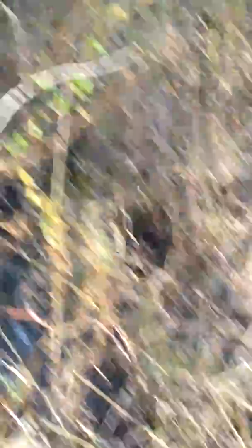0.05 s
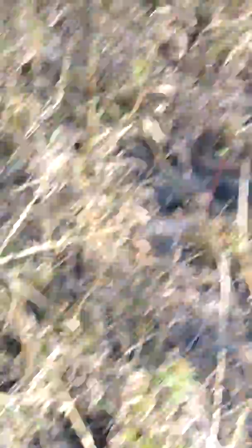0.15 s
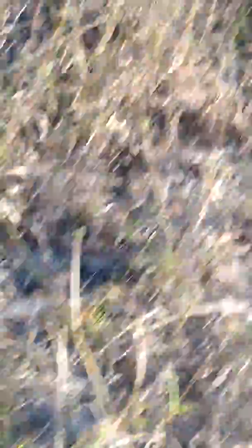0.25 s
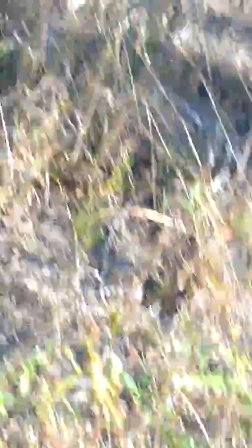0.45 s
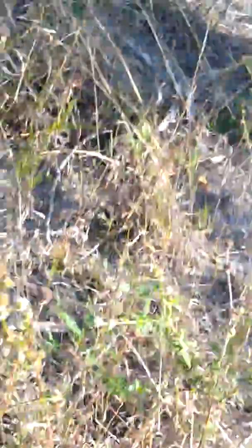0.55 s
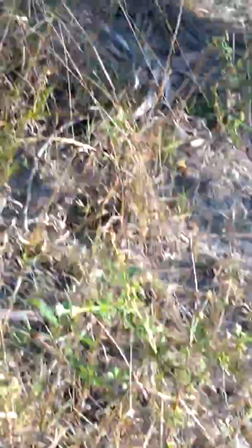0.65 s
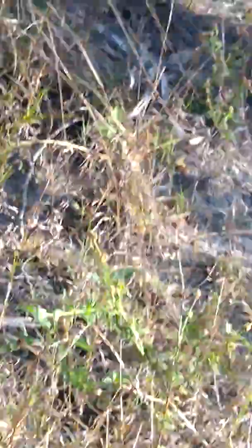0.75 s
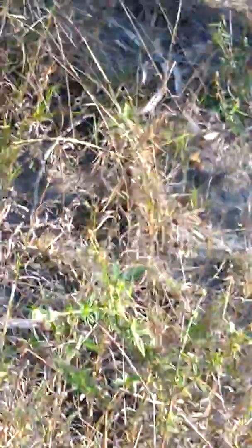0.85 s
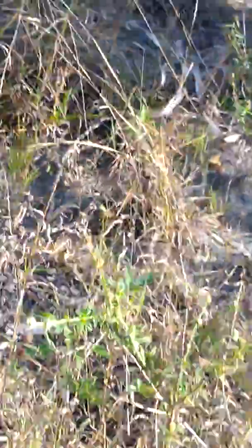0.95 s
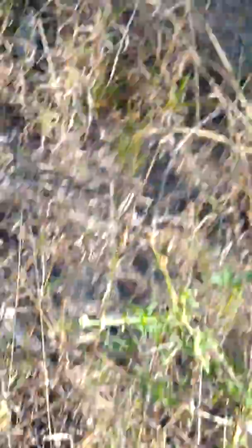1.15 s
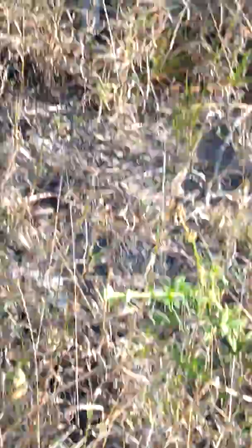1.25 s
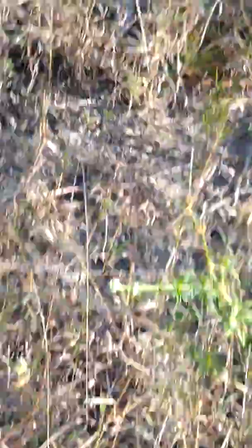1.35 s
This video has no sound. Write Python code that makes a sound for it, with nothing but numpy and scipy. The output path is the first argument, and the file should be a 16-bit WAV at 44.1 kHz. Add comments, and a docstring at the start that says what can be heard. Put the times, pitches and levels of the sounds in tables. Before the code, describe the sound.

Something knocks against the microphone and drags across it on the right, thudding and distorting briefly. Around it, dry grass rustles quietly close by outdoors, with a faint low hum, one thin distant whistle and then small stalk ticks.

```python
"""A bump on the right microphone of a hand-held camera, carried by someone stepping through dry grass.
Something hits it and rubs across: a crack, a few overloaded low thuds, a short scrape.
Dry blades swish and stalks tick around both microphones; light strokes brush the case.
A faint low hum runs underneath, and one thin, far whistle follows the bump."""
import sys
import numpy as np
from scipy import signal
from scipy.fft import rfft, irfft
from scipy.io import wavfile

SR = 44100
rng = np.random.default_rng(int(sys.argv[2]) if len(sys.argv) > 2 else 0)


def waveform_to_disk(signal):
    """Save audio, clipped to [-1, 1], as 16-bit WAV at the path in sys.argv[1]."""
    frames = np.transpose(np.atleast_2d(signal))
    scaled = np.clip(frames, -1, 1) * 32767
    samples = np.round(scaled).astype(np.int16)
    wavfile.write(sys.argv[1], SR, samples)


N = 61739
T = np.arange(N) / SR


def from_db(db):
    """Decibels to gain."""
    return 10 ** (np.asarray(db) / 20)


def unit_rms(x):
    """Scale to rms 1."""
    return x / np.sqrt(np.mean(x ** 2) + 1e-20)


def gain_curves(rows):
    """Each dB column of a timed table as a gain per sample."""
    times_s, *columns_db = np.transpose(rows)
    return np.array([from_db(np.interp(T, times_s, db)) for db in columns_db])


def stereo_gains(db, pan_db):
    """Left and right gains, pan_db apart, centred on db."""
    return from_db(db + np.array([[pan_db], [-pan_db]]) / 2)


def butter(x, hz, kind, order=2):
    """Causal low- or high-pass."""
    return signal.sosfilt(signal.butter(order, hz, kind, fs=SR, output="sos"), x + 1e-18)


def colour(x, spectrum):
    """Give a steady texture a spectrum; rms 1."""
    hz, db = np.transpose(spectrum)
    bins_hz = np.maximum(np.arange(N // 2 + 1) * SR / N, 1)
    shape = from_db(np.interp(np.log(bins_hz), np.log(hz), db))
    bass_rolloff = np.minimum(bins_hz / hz[0], 1) ** 2
    return unit_rms(irfft(rfft(x) * shape * bass_rolloff, N))


def decay(start_s, t60_s):
    """Sudden start, then an exponential fall."""
    return (T >= start_s) * from_db(-60 * np.maximum(T - start_s, 0) / t60_s)


def crackle(clicks_per_s=860, spread_db=2.5, click_share=0.38):
    """Dense tiny clicks of uneven size in smooth noise; rms 1."""
    sizes = from_db(spread_db * np.minimum(rng.exponential(1, N), 4)) * rng.choice([-1, 1], N)
    clicks = unit_rms(sizes * (rng.random(N) < clicks_per_s / SR))
    return np.sqrt(click_share) * clicks + np.sqrt(1 - click_share) * rng.standard_normal(N)


def flutter(depth_db=1.47, cutoff_hz=30):
    """Level wobble of blades that catch and slip."""
    return from_db(depth_db * unit_rms(butter(rng.standard_normal(N), cutoff_hz, "low")))


# Grass envelopes, before trim. Each row: time in seconds, left level in dB, right level in dB.
SWISH_LEVELS = [(0, -51.5, -48.5), (0.04, -56.6, -49.5), (0.07, -54.5, -51.5), (0.17, -60, -54),
                (0.205, -59, -47), (0.27, -66, -59), (0.33, -57.5, -51.5), (0.42, -71, -62),
                (0.48, -72, -58.5), (0.58, -95, -59.5), (0.72, -85, -63), (0.85, -81.5, -60),
                (0.95, -68.5, -56.5), (1.07, -64, -54.5), (1.14, -56.5, -50), (1.22, -62.0, -53),
                (1.3, -66, -65.5), (1.4, -57, -73)]
HISS_LEVELS = [(0, -47, -50.0), (0.04, -49, -46.5), (0.08, -52.5, -54), (0.16, -55.6, -58.5),
               (0.205, -49, -48), (0.27, -57.5, -56.5), (0.33, -45, -69), (0.41, -46.9, -49.5),
               (0.48, -50, -55), (0.57, -52, -57.5), (0.72, -62.5, -89), (0.88, -70.5, -75),
               (0.965, -68, -73), (0.99, -58, -75), (1.09, -53.5, -71), (1.14, -49, -52),
               (1.21, -58.5, -63.5), (1.29, -57.5, -86), (1.38, -46.5, -103)]
# Grass spectra. Each row: frequency in Hz, relative density in dB.
SWISH_LEFT_SPECTRUM = [(200, -13), (380, -8.5), (620, -5.5), (1000, -7.5), (2100, -1.5), (3200, -2),
                       (4500, -40), (16000, -51)]
SWISH_RIGHT_SPECTRUM = [(200, -2.5), (400, -12), (600, -2.5), (1100, -4), (2300, 1), (4000, -1.5),
                        (5200, 1.5), (7000, -4.5), (9000, -26), (16000, -42.5)]
HISS_LEFT_SPECTRUM = [(1500, -21.5), (3500, -11), (6000, -8.5), (9000, -3.5), (12500, 3.5), (15500, 0)]
HISS_RIGHT_SPECTRUM = [(3000, -42), (6000, 2), (7500, -1.5), (10000, -5), (13000, -6.5), (15500, -6.5)]

def grass(swish_trim_db=-2.5, hiss_trim_db=1.5):
    """Dry blades slide past each microphone: a grainy swish and a fine hiss."""
    def rustle(levels, *spectra):
        return gain_curves(levels) * np.array([colour(crackle(), side) * flutter() for side in spectra])

    swish = rustle(SWISH_LEVELS, SWISH_LEFT_SPECTRUM, SWISH_RIGHT_SPECTRUM)
    hiss = rustle(HISS_LEVELS, HISS_LEFT_SPECTRUM, HISS_RIGHT_SPECTRUM)
    return from_db(swish_trim_db) * swish + from_db(hiss_trim_db) * hiss


# Hum envelope. Each row: time in seconds, fundamental rms in dB, octave rms in dB.
HUM_LEVELS = [(0, -59.5, -70.5), (.2, -61.5, -67.5), (.45, -56, -88), (.62, -58, -71), (.86, -59.5, -69.5),
              (1.0, -56, -63), (1.25, -56.5, -60), (1.4, -56, -57.5)]

def hum(pitch_hz=80.5, third_re_octave_db=-19):
    """A low hum of three harmonics at a steady pitch."""
    fundamental_gain, octave_gain = gain_curves(HUM_LEVELS)
    phase = 2 * np.pi * pitch_hz * T
    overtones = np.sin(2 * phase) + from_db(third_re_octave_db) * np.sin(3 * phase)
    return np.sqrt(2) * (fundamental_gain * np.sin(phase) + octave_gain * overtones)


# Air spectrum. Each row: frequency in Hz, relative density in dB.
AIR_SPECTRUM = [(25, 6), (70, 4), (150, 12.5), (300, -15.5), (1000, -16), (4000, -49), (16000, -37)]

def air(level_db=-67.5):
    """Quiet outdoor air: low noise, independent on each side."""
    return from_db(level_db) * np.array([colour(rng.standard_normal(N), AIR_SPECTRUM) for _ in range(2)])


# Stalk ticks. Each row: start in seconds, peak before panning in dB, centre in Hz, t60 in seconds,
# left minus right in dB.
STALK_TICKS = [(.046, -37, 7150, 0.008, 2), (0.091, -41, 2030, .04, -4), (0.2, -41.5, 6060, 0.019, 8),
               (.527, -36, 12010, .008, 7), (0.87, -55.5, 2125, 0.016, -7),
               (0.9806, -46.5, 12800, 0.029, 17.5), (1.015, -47, 2190, 0.043, -7),
               (1.062, -49, 2230, 0.031, 0), (1.086, -48, 2200, 0.057, -11),
               (1.101, -47.5, 1570, 0.061, -2), (1.1191, -41.5, 5250, 0.022, -11),
               (1.1224, -41.5, 1750, 0.016, -15), (1.144, -42.5, 5400, 0.013, -11),
               (1.1451, -36.5, 12500, .018, 10), (1.156, -43.5, 2400, .025, -6),
               (1.178, -38, 5240, .01, -10), (1.207, -68, 2000, .005, 12), (1.236, -45, 5130, .015, 1),
               (1.2937, -48, 12700, 0.0031, 27), (1.3638, -44, 12100, 0.0032, 29)]

def stalks(resonance_q=1 / 0.37):
    """A stalk that flicks or snaps is a brief burst in one broad resonance."""
    out = np.zeros((2, N))
    for start_s, peak_db, centre_hz, t60_s, pan_db in STALK_TICKS:
        burst = decay(start_s, t60_s) * rng.standard_normal((2, N)) + 1e-18
        b, a = signal.iirpeak(centre_hz, resonance_q, fs=SR)
        tick = signal.lfilter(b, a, signal.lfilter(b, a, burst))
        out += stereo_gains(peak_db, pan_db) * tick / np.abs(tick).max()
    return out


# Strokes on the case. Each row: start in seconds, length in seconds, level in dB, low edge in Hz,
# high edge in Hz, left minus right in dB.
CASE_BRUSHES = [(0.163, 0.072, -69, 230, 500, -23), (0.375, 0.1, -55.5, 396, 4600, -18.5),
                (0.386, 0.087, -62, 107, 298, -34.5), (1.284, 0.064, -57.5, 125, 221, -21.5),
                (1.348, 0.054, -63, 108, 300, 7)]

def brushes():
    """Light strokes along the case: each is a grainy swell in its own band."""
    out = np.zeros((2, N))
    for start_s, length_s, db, low_hz, high_hz, pan_db in CASE_BRUSHES:
        stroke = np.sin(np.pi * np.clip((T - start_s) / length_s, 0, 1))
        friction = unit_rms(butter(butter(crackle(), high_hz, "low"), low_hz, "high", order=4))
        out += stereo_gains(db, pan_db) * stroke * friction
    return out


# Rubbing pressure. Each row: time in seconds, level in dB.
RUB_LEVELS = [(.218, -67), (.236, -31), (.246, -18), (.274, -13.5), (.29, -26.5), (.316, -28.5),
              (.328, -17.5), (.342, -26), (.372, -18), (.385, -34), (.397, -66)]
# Friction spectrum. Each row: frequency in Hz, relative density in dB.
FRICTION_SPECTRUM = [(30, -11), (46, 12.5), (90, -21.5), (200, 2.5), (400, -4), (700, -13.5), (1200, -22),
                     (2200, -33), (5000, -47), (16000, -84)]

def rubbing():
    """Something drags across the microphone: a dull friction rumble."""
    touching = (T > RUB_LEVELS[0][0]) & (T < RUB_LEVELS[-1][0])
    return gain_curves(RUB_LEVELS)[0] * touching * colour(crackle(), FRICTION_SPECTRUM)


# Sharp contacts. Each row: start in seconds, body peak before low-pass in dB, crack level in dB,
# crack t60 in seconds.
MIC_KNOCKS = [(0.242, -2, -19.5, 0.039), (0.2435, -8.5, -20, 0.0072), (0.2487, 0.5, -23, 0.015),
              (.3248, -6, -38.5, 0.0078), (.3815, -18.5, -30.5, .01), (.409, -50, -29, 0.0044),
              (0.7931, -42, -39.5, 0.0051), (1.3287, -36, -37.5, 0.0045)]
# Case modes. Each row: frequency in Hz, relative level in dB, t60 in seconds.
CASE_RESONANCES = [(358, 3.5, 0.054), (513, 17, 0.017), (839, 2, 0.016), (1750, -27, 0.0065)]

def knocks(step_relative_db=-15.5, low_hz=359, knee_hz=1670, top_hz=5650):
    """A contact is a pressure step, a short ring of the camera's case and a gritty crack."""
    out = np.zeros(N)
    for start_s, body_db, crack_db, crack_t60_s in MIC_KNOCKS:
        body = from_db(step_relative_db) * decay(start_s, t60_s=0.005)
        for hz, mode_db, t60_s in CASE_RESONANCES:
            body += from_db(mode_db) * decay(start_s, t60_s) * np.sin(2 * np.pi * hz * (T - start_s))
        body = butter(body / np.abs(body).max(), knee_hz, "low", order=1)
        grit = butter(rng.standard_normal(N), knee_hz, "low", order=1)
        grit = butter(grit, top_hz, "low", order=1)
        crack = decay(start_s, crack_t60_s) * unit_rms(butter(grit, low_hz, "high"))
        out += from_db(body_db) * body + from_db(crack_db) * crack
    return out


# Thuds of the bump. Each row: start in seconds, level in dB, starting pitch in Hz, swell in seconds,
# fade in seconds.
MIC_THUDS = [(0.2499, 0, 91.5, 0.0057, 0.033), (0.2937, -8.5, 76, 0.021, 0.0047),
             (0.3215, -9, 65.8, 0.0071, 0.0093), (.324, -9.5, 157.6, 0.019, 0.0079),
             (.350, -12, 127.3, 0.0092, 0.029)]

def thuds(rise_hz_per_s=950, octave_db=-11.5):
    """Each push swells and fades as a low boom whose pitch rises while the contact tightens."""
    out = np.zeros(N)
    for start_s, db, hz, swell_s, fade_s in MIC_THUDS:
        age_s = np.maximum(T - start_s, 0)
        envelope = np.sin(np.pi / 2 * np.interp(age_s, [0, swell_s, swell_s + fade_s], [0, 1, 0]))
        phase = 2 * np.pi * (hz * age_s + rise_hz_per_s * age_s ** 2 / 2)
        out += from_db(db) * envelope * (np.sin(phase) + from_db(octave_db) * np.sin(2 * phase))
    return out


def whistle(start_s=0.675, length_s=0.135, start_hz=2790, rise_hz_per_s=610, peak_db=-65.5):
    """One thin, far whistle, perhaps a bird, rising a little."""
    age_s = np.clip(T - start_s, 0, length_s)
    swell = np.sin(np.pi * age_s / length_s)
    phase = 2 * np.pi * (start_hz * age_s + rise_hz_per_s * age_s ** 2 / 2)
    return from_db(peak_db) * swell * np.sin(phase)


def scene():
    """Rustle, hum and air reach both microphones; the bump and the whistle are on the right."""
    out = grass() + stalks() + brushes() + hum() + air()
    out[1] += thuds() + knocks() + rubbing() + whistle()
    return out


def record(dry):
    """The overloaded microphone rounds off the loudest peaks; a steep low-pass cuts the top."""
    cutoff_hz = 15700
    rounded = dry / (1 + dry ** 4) ** (1 / 4)
    return signal.sosfilt(signal.ellip(12, .1, 90, cutoff_hz, fs=SR, output="sos"), rounded)


dry = scene()
out = record(dry)
waveform_to_disk(out)
```